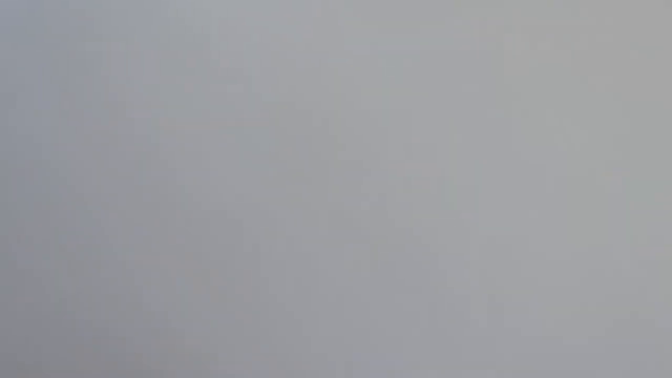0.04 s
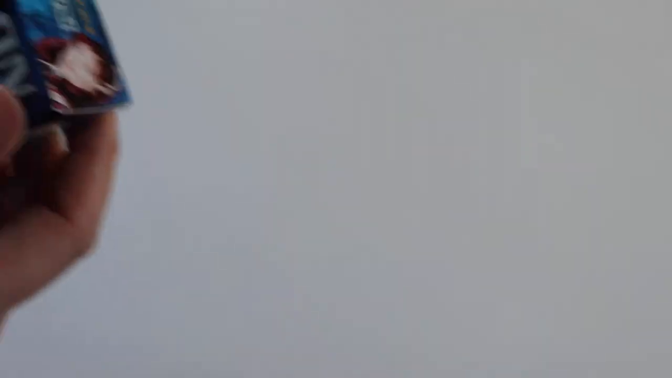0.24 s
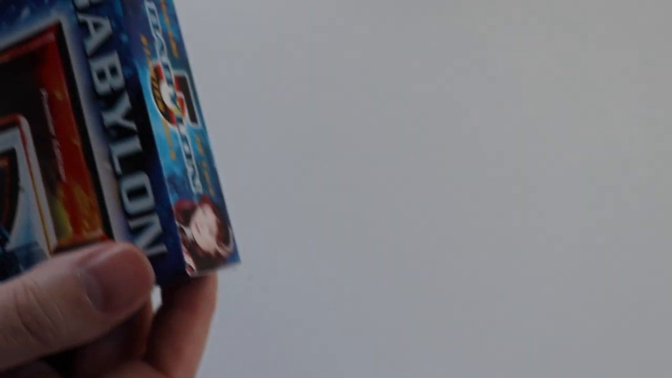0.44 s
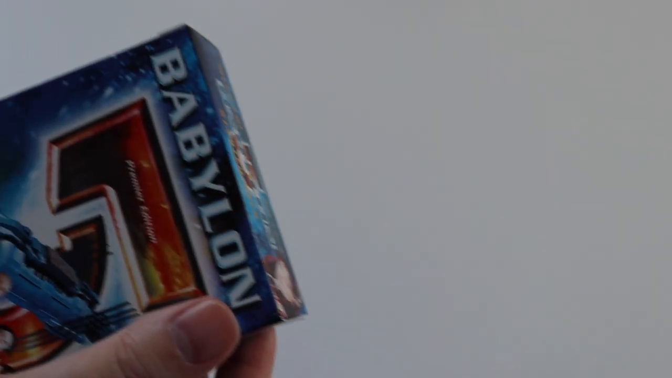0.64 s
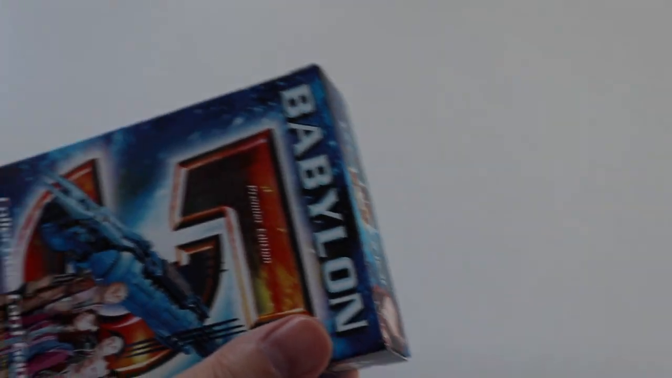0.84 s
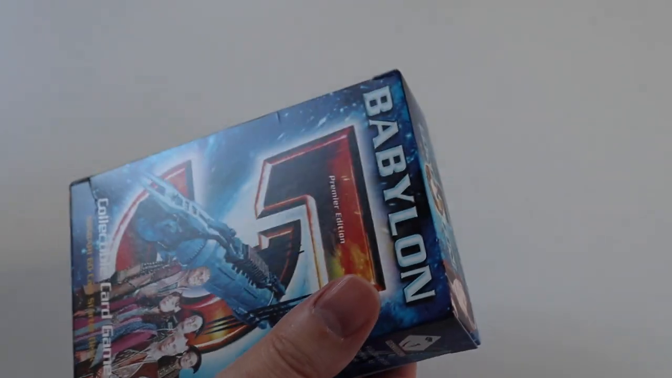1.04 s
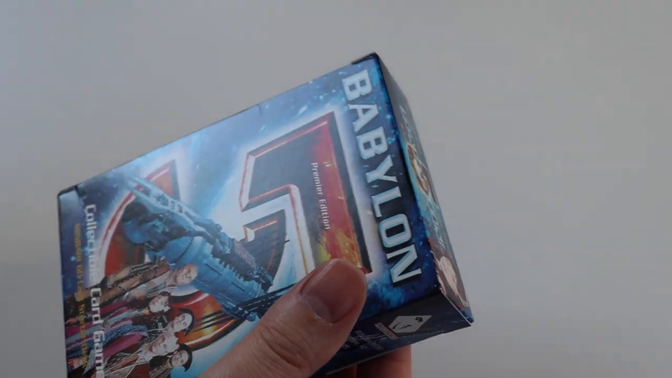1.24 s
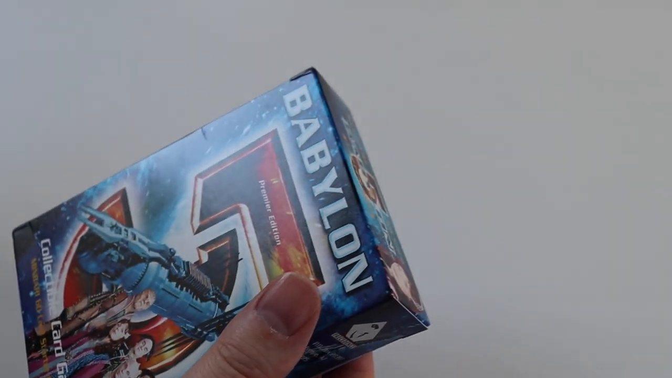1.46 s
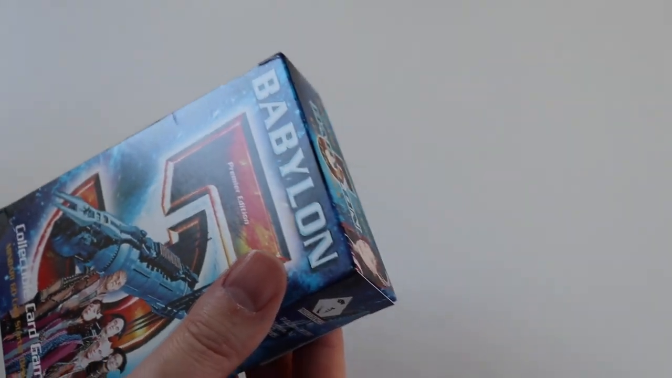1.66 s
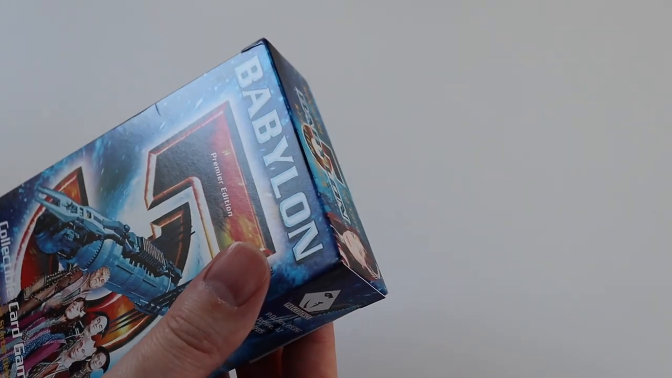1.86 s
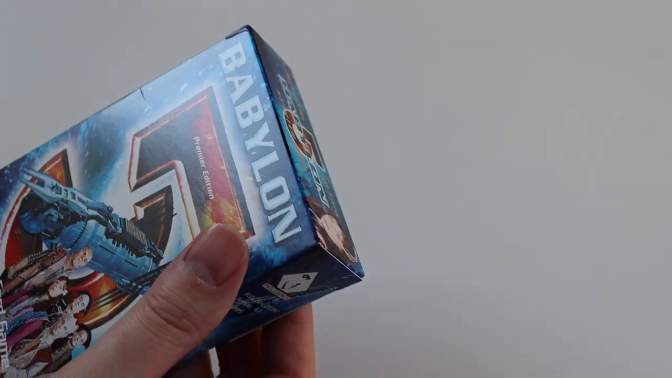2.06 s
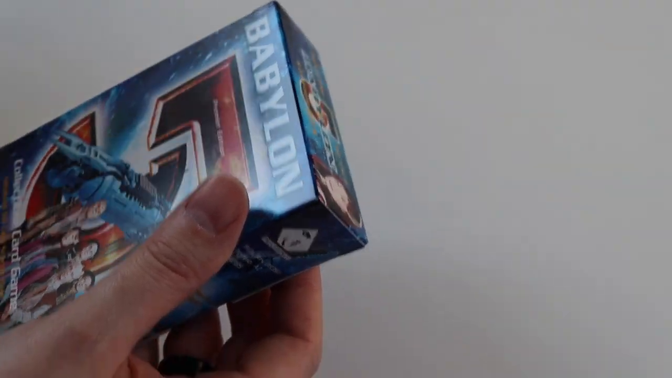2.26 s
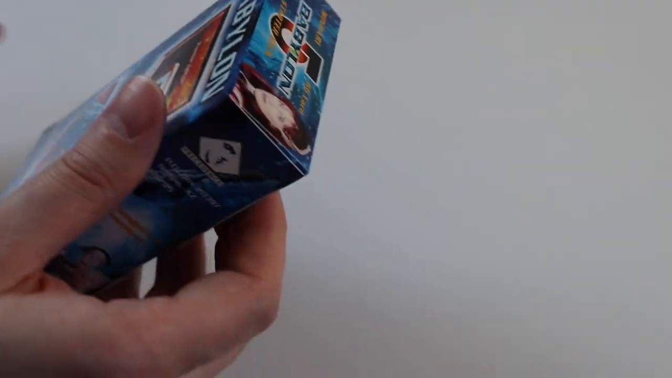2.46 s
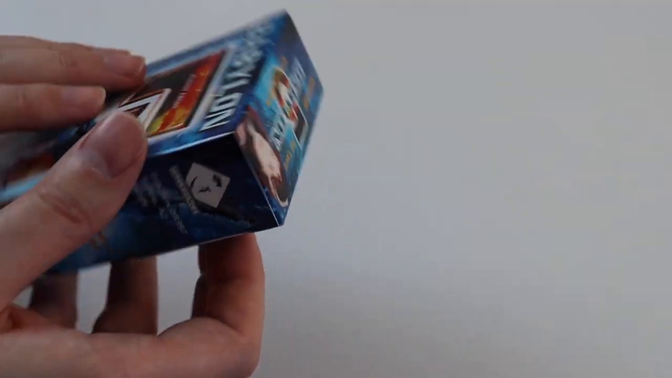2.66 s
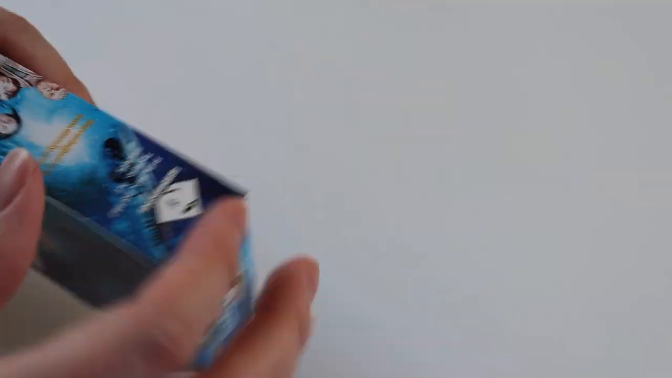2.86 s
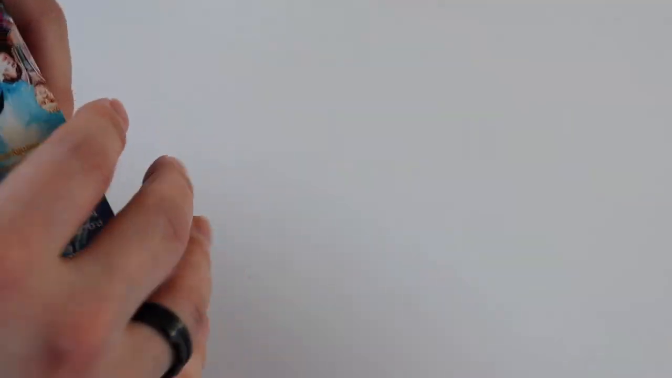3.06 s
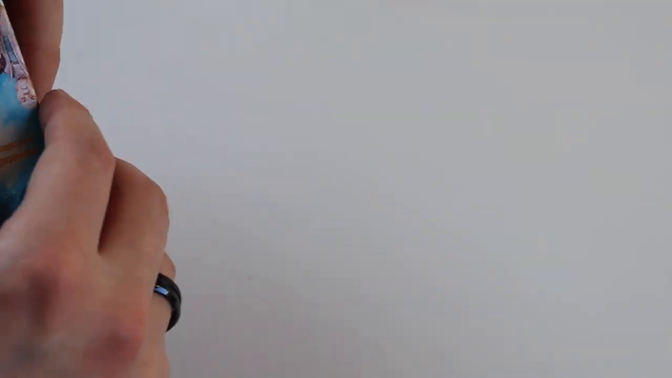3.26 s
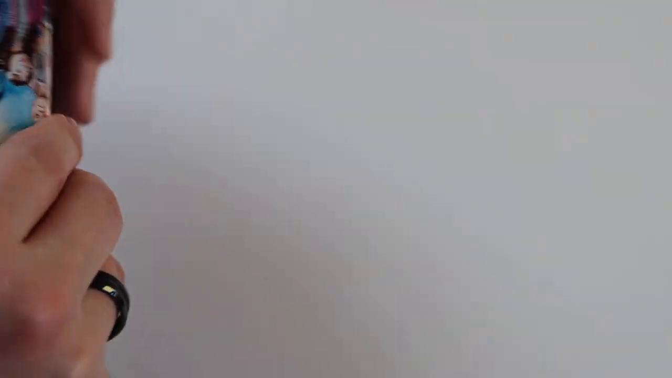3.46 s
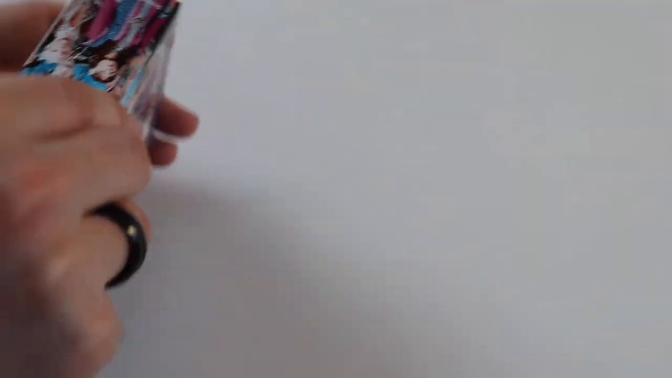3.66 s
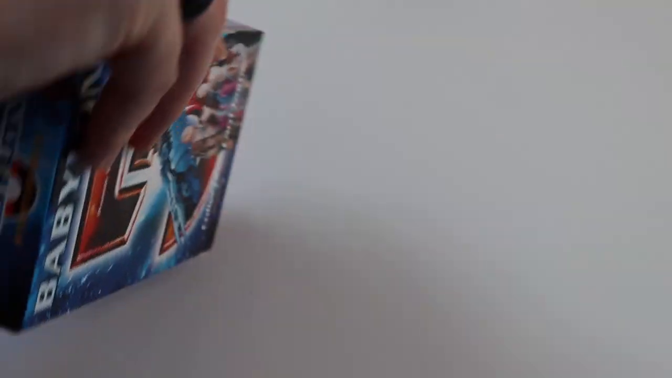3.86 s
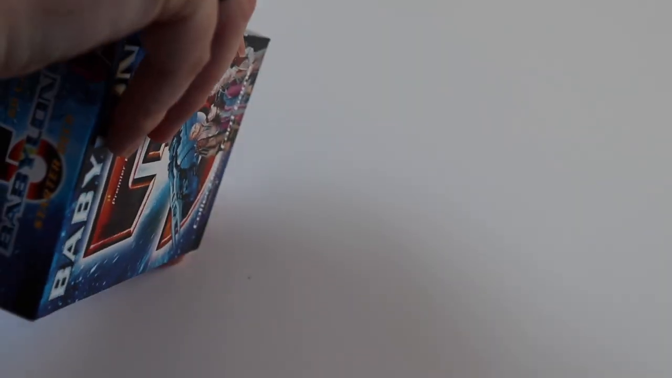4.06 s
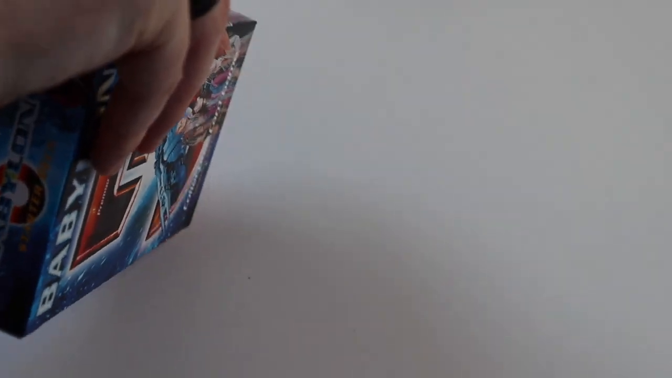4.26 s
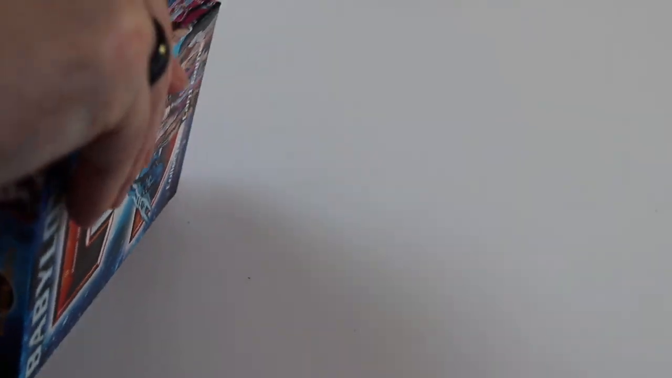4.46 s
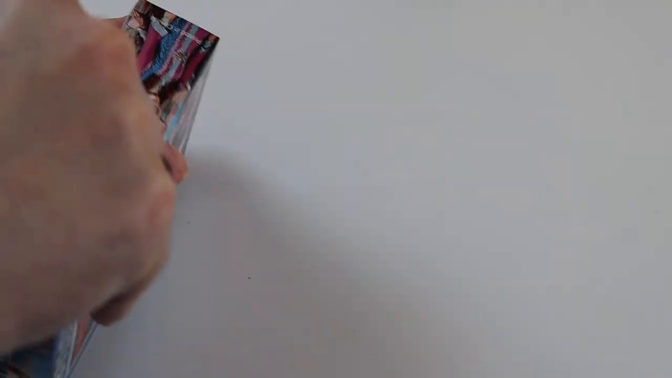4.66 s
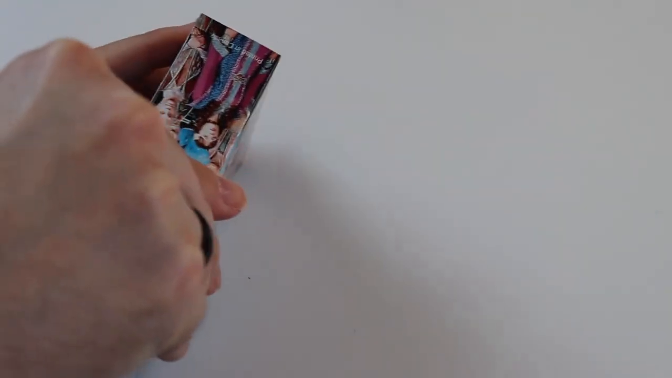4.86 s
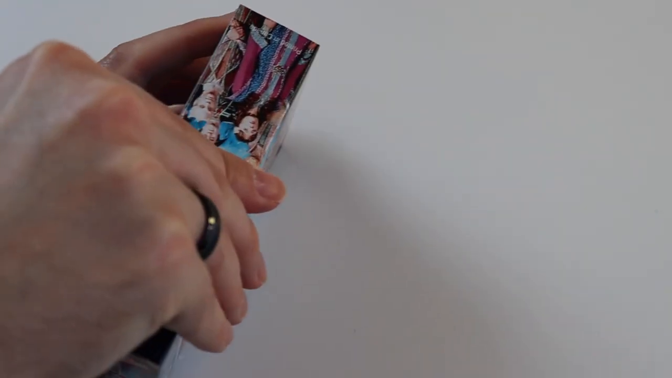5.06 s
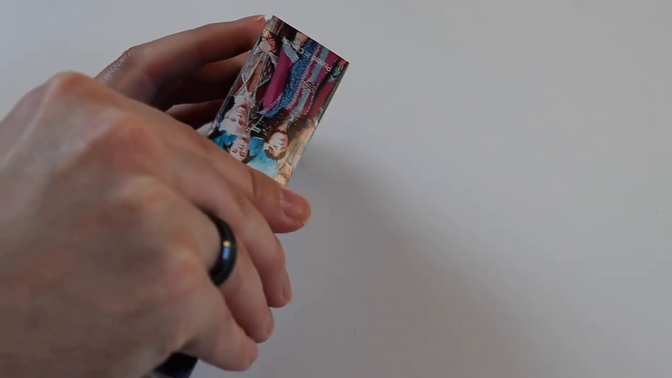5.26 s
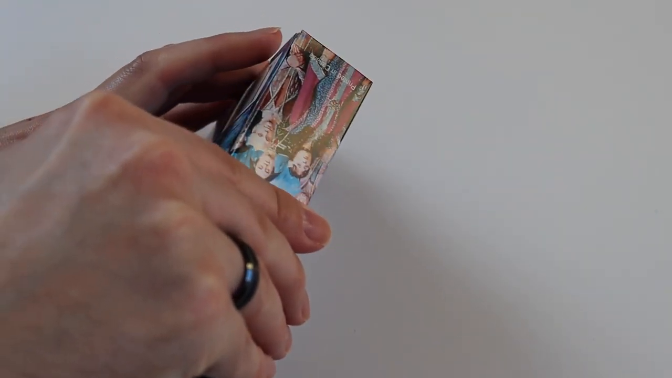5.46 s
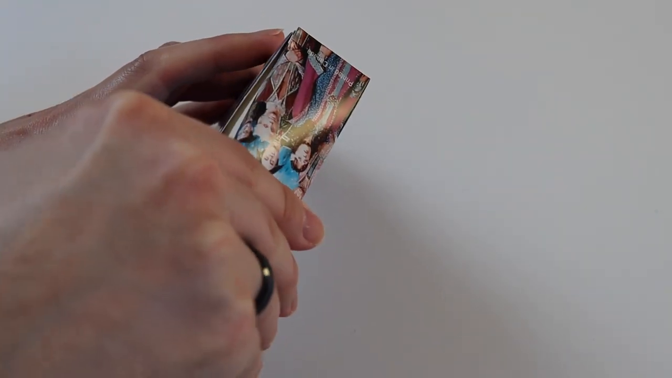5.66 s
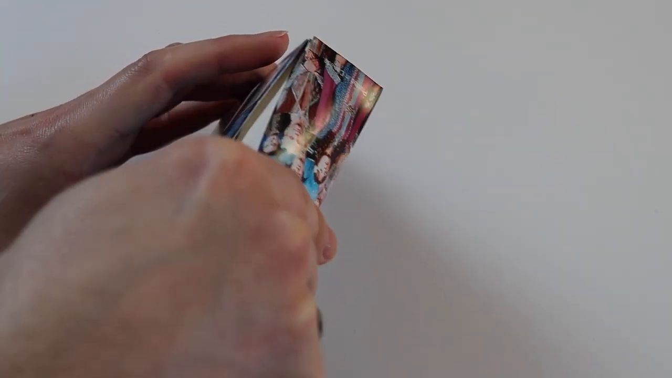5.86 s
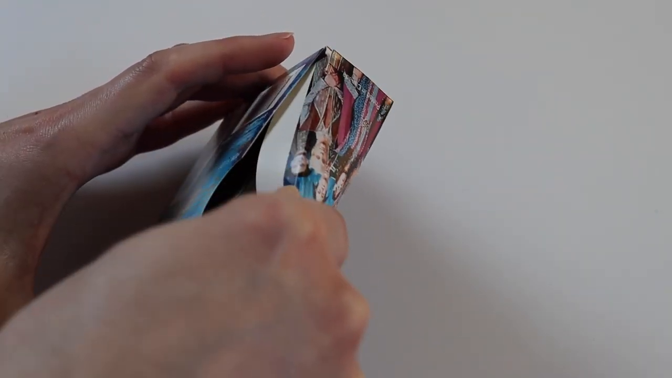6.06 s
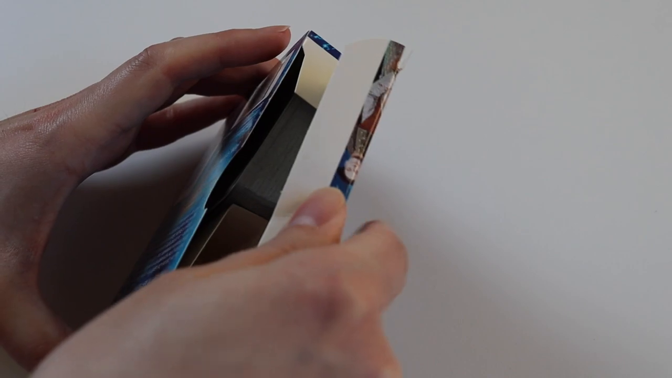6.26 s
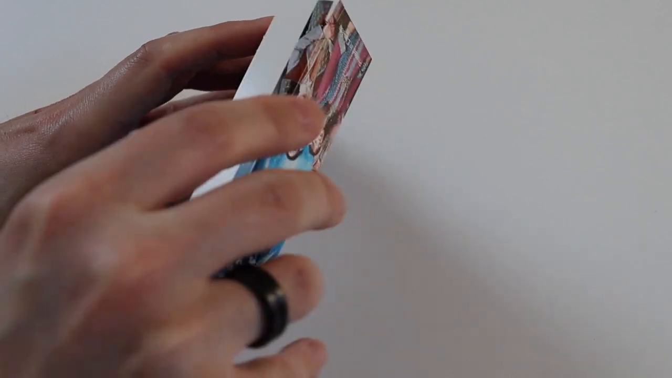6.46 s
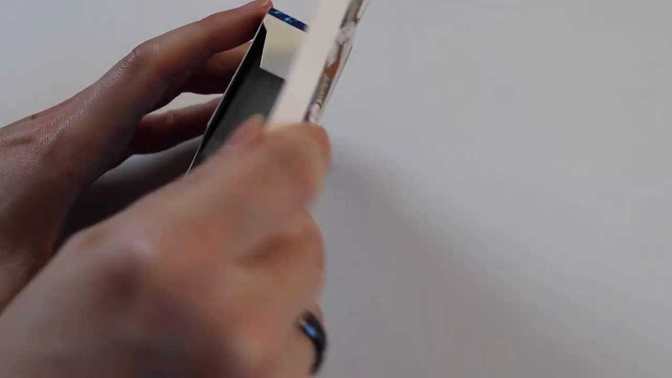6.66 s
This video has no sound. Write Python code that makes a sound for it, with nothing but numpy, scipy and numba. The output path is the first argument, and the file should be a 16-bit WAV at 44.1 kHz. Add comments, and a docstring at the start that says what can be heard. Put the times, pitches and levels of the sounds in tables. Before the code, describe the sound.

Fingers tap and slide over a small cardboard box close by, until its glued flap pops open with loud cracks.

```python
"""A small cardboard box is tapped, turned and pried open at its glued flap, close to a stereo microphone.
Taps, rattles and glue snaps are impulses that excite the damped modes of its panels. Sliding fingers
drive the same modes by stick-slip friction, and dry skin hisses on the print. Beneath the box the
tabletop rumbles and jolts under the forearms; a small quiet room adds its reverberation."""
import sys
import numpy as np
from scipy import signal
from scipy.fft import rfft, irfft, next_fast_len
from scipy.io import wavfile
from scipy.ndimage import uniform_filter1d, map_coordinates
from numba import njit

SR = 44100
rng = np.random.default_rng(int(sys.argv[2]) if len(sys.argv) > 2 else 0)


def to_wav(sig):
    """Store sig (one row per channel, or 1-D mono) as 16-bit WAV at the path in sys.argv[1].

    Samples outside -1..1 are clipped; the rate is SR.
    """
    pcm = np.clip(np.atleast_2d(sig), -1, 1) * 32767
    pcm = np.round(pcm).astype(np.int16)
    wavfile.write(sys.argv[1], SR, pcm.T)  # frames by channels


N = 296352

# Spectra, as relative level per hertz: f/Hz, level/dB
NOISE_FLOOR = [(18, -45), (30, -15), (204, -0.5), (364, -4), (554, -11), (632, -10), (1010, -6),
               (3670, -9.5), (9970, -18.5), (14800, -18.5), (16000, -21)]  # room tone and microphone hiss
SKIN_HISS = [(3500, 10.5), (5000, 7.5), (7000, 7), (10000, 1), (13000, -7), (16500, -26.5)]  # dry skin on print
CRACK = [(3000, 4), (5000, 8), (7000, 5), (10000, -0.5), (13000, -1), (16500, -3.5)]  # a hard contact
# Filter responses: f/Hz, gain/dB
RADIATION = [(60, -68), (200, -10.5), (300, -3), (20000, -1.5)]  # a small box moves little air in the bass
SHARED_TONE = [(20, -22), (500, 10.5), (1400, -23), (16000, -44)]
TABLE_RING = [(40, -49), (110, -15), (150, -2), (900, 8), (3000, -20)]
TABLE_SHAKE = [(25, -2), (60, -2), (90, 4.5), (130, 9), (170, -26), (400, -62)]
SKIN_AIR = [(9000, -31), (12500, -8), (15500, 6.5), (20000, 6)]
# Reverberation bands: f/Hz, t60/s, level/dB
ROOM_BANDS = [(262, 0.23, -21), (1094, 0.36, -6.5), (3330, 0.48, -11), (10500, 0.53, -15)]
# Normal modes: f/Hz, level/dB, t60/s
TABLE_MODES = [(148, 6.5, 0.2), (173, -30, 0.27), (186.5, 15, 0.21), (249.7, 3.5, 0.72), (350, 1, 0.3),
               (526, -6, 0.31)]
BOX_MODES = [(257.5, -21, 0.083), (359.6, -7.5, 0.082), (457, -1.5, 0.041), (491.6, -5.5, 0.061),
             (581, 1.5, 0.039), (648, -2.5, 0.081), (771, 2, 0.036), (890, -1, 0.012), (962, 4.5, 0.024),
             (1164, 5.5, 0.014), (1309, -2, 0.032), (1440, -1, 0.048), (1716, 8, 0.011), (2038, 2, 0.016),
             (2165, -1.5, 0.032), (2420, 5, 0.012), (2840, 6, 0.014), (3205, -1.5, 0.036),
             (3880, -2.5, 0.029), (4145, -1, 0.03), (4320, 6, 0.0037)]
# Arms and box pushing the tabletop: peak t/s, 20 dB rise/s, 20 dB fall/s, ring/dB, shake/dB
PUSHES = [(0, .1, 0.09, -57, -70), (.19, 0.028, 0.11, -47, -59), (.35, 0.036, .1, -49, -77),
          (.43, 0.17, 0.23, -38.5, -67), (.515, 0.14, 0.054, -51, -42.5), (.82, .2, 0.19, -52.5, -65),
          (1.16, 0.11, .1, -52.5, -62), (1.2, .06, 0.1, -52, -49.5), (1.78, .06, 0.36, -56.5, -87),
          (2.21, .07, .08, -61, -72), (2.75, .17, 0.26, -53, -70), (3.07, 0.28, 0.072, -53, -68),
          (3.22, .2, .1, -62.5, -68), (3.46, 0.064, 0.1, -50.5, -74), (3.78, 0.044, 0.081, -47, -82),
          (4.02, 0.33, .1, -57, -67), (4.7, 0.058, 0.21, -54.5, -68), (5.02, 0.17, .1, -64, -72),
          (5.39, 0.18, 0.16, -55.5, -61.5), (5.64, .04, 0.22, -56, -58), (5.78, 0.22, 0.2, -61, -51.5),
          (5.99, 0.035, 0.22, -41.5, -62), (6.12, 0.046, .2, -42, -54), (6.25, 0.12, 0.033, -44, -68),
          (6.38, 0.055, 0.051, -71, -76), (6.46, 0.084, 0.053, -57, -62), (6.72, 0.37, .1, -61, -64.5)]
# A glue spot lets go or a hand lands: t/s, f/Hz, level/dB, t60/s
JOLTS = [(.395, 186.4, -29.5, 0.47), (1.558, 298, -39, .025), (1.785, 300, -37, .03),
         (2.195, 297, -37, 0.034), (3.887, 340, -30.5, 0.034), (4.005, 60, -50, .05),
         (4.217, 300, -39.5, 0.035), (4.856, 380, -31, 0.021), (5.642, 150, -38, 0.047),
         (5.988, 252, -18, 0.086), (6.123, 70, -28, .03), (6.126, 232, -21, 0.045)]
# Finger slides: peak t/s, 20 dB rise/s, nominal fall/s, dull scrape/dB, bright scrape/dB, skin hiss/dB
SLIDES = [(0, .1, 0.25, -50.5, -41, -39.5), (.08, 0.15, 0.11, -50, -60, -50.5),
          (.182, 0.045, 0.24, -50, -49, -52), (.322, 0.23, 0.13, -51, -47, -44),
          (.432, 0.17, 0.13, -45, -45.5, -47.5), (.6, 0.41, 0.44, -52, -52, -47.5),
          (.72, 0.3, 0.38, -53, -49, -44.5), (.9, 0.33, 0.45, -68, -55, -54.5),
          (1.005, 0.046, 0.21, -59.5, -48, -42.5), (1.277, 0.4, 0.16, -56, -56.5, -63),
          (1.457, 0.24, 0.045, -63.5, -75, -55), (1.569, 0.029, 0.38, -62.5, -53, -53),
          (1.689, 0.35, .17, -69, -65, -53), (1.798, 0.061, 0.26, -55.5, -51.5, -46),
          (2.08, 0.028, 0.46, -73, -61, -55.5), (2.275, 0.044, 0.047, -51, -53, -47),
          (2.504, 0.031, 0.041, -30, -34, -50), (2.684, 0.027, 0.23, -47, -52, -56),
          (2.735, 0.091, 0.13, -56, -45, -41), (2.785, 0.095, 0.076, -39.5, -37.5, -55),
          (2.901, 0.36, 0.25, -45, -78, -76), (3.113, 0.021, 0.28, -56, -46.5, -48),
          (3.153, 0.035, 0.046, -24, -54, -49), (3.27, 0.08, 0.28, -48, -55, -47),
          (3.335, 0.062, 0.12, -41.5, -46, -41), (3.539, 0.13, 0.085, -45, -48, -49),
          (3.754, 0.018, 0.16, -42, -38.5, -42.5), (3.779, 0.025, 0.13, -29.5, -36.5, -43),
          (3.9, 0.027, .2, -35, -45, -46), (3.943, 0.043, 0.089, -26, -30.5, -35),
          (4.018, 0.063, 0.074, -25, -28.5, -36.5), (4.21, .1, .06, -54.5, -58, -56),
          (4.365, 0.2, 0.044, -54.5, -56.5, -60), (4.622, 0.27, 0.067, -52.5, -67, -75),
          (4.679, .03, .2, -52, -53.5, -59), (4.88, 0.038, 0.16, -43, -46, -50.5),
          (4.925, 0.15, 0.035, -42.5, -51, -49.5), (5.116, 0.36, 0.067, -54, -54, -58),
          (5.173, .1, 0.33, -69, -61, -56), (5.34, 0.37, 0.36, -45.5, -59, -80),
          (5.51, 0.27, 0.25, -55, -63, -64), (5.587, 0.035, 0.11, -30.5, -36.5, -50),
          (5.655, 0.011, 0.14, -25.5, -28.5, -24), (5.707, 0.05, 0.03, -37, -34, -26),
          (5.782, 0.044, 0.087, -42, -34, -33.5), (5.874, .04, 0.074, -30.5, -33, -33),
          (5.999, 0.015, .1, -25.5, -27.5, -30.5), (6.136, 0.076, 0.16, -28.5, -27.5, -29.5),
          (6.22, 0.23, 0.19, -38.5, -32, -57), (6.453, 0.053, 0.11, -39.5, -44.5, -48.5),
          (6.657, 0.14, 0.074, -46.5, -51.5, -48.5)]
# Grip while rubbing: t/s, free low panel f/Hz, free high panel f/Hz, low panel/dB, top of skin hiss/dB
GRIP = [(0, 710, 2950, 2, -10), (.08, 696, 2950, -8, 8.5), (.19, 460, 2400, -13, -2),
        (.69, 770, 2290, -23, -10), (1.05, 710, 3050, -4, -6), (1.3, 580, 2630, -5, -6),
        (1.76, 600, 2310, 0, -6), (2.04, 560, 3020, -13, -3), (2.5, 560, 1710, -11, -8),
        (2.86, 980, 1730, -27, -7), (3.2, 830, 1660, -2, -7), (3.33, 1100, 2050, 1.5, -15),
        (3.55, 417, 2050, 2.5, -5), (3.72, 810, 2220, -1.5, -17), (4.25, 700, 1990, -10.5, -5),
        (4.71, 443, 1950, 3, -12), (5.11, 820, 2060, -34, -13), (5.54, 643, 1920, -9, -34),
        (5.87, 660, 2430, 7, -8), (5.99, 880, 2570, -4, -17), (6.31, 636, 2300, 0.5, -25),
        (6.72, 836, 2400, -8, -10)]
# Taps, rattles and snaps: t/s, level/dB, struck panel f/Hz, hollow/dB, panel/dB, crack/dB,
# chatter decay/ms, struck panel/dB, left minus right/dB; hollow, panel and crack are relative to level
KNOCKS = [(.022, -26.5, 833, -16, -33, -9, 7, 13, 5), (0.155, -36.5, 372, -6, -7, -39, 5, 10, -7),
          (.169, -28.5, 330, -17.5, -31, -13, 30, 23, 0), (0.266, -23, 315, -26, -23, -14.5, 2.5, 7, 0),
          (.28, -33, 390, -8, -14, -27, 6.4, 3, -3), (.303, -29, 7460, -33, -29, -3.5, 4.1, 5, -1),
          (.329, -37, 790, -24, -18, -5.5, 6, 16, -7), (.394, -35, 365, -7, -24, -4.5, 7, 9, -1),
          (.425, -27.5, 825, -13, -7.5, -36, 8.6, 11, 0), (.494, -40, 550, -13, -23, -5, 4.7, 18, -8),
          (.589, -43, 1040, -24, -18, -15, 7.6, 13, 2.5), (.651, -28, 5360, -31, -22, -9, 10, 5, -1),
          (.696, -32, 1840, -16.5, -9, -9.5, 9.2, 6, -5), (.719, -35.5, 2730, -31, -12, -3.5, 5.4, 17, -3),
          (0.818, -35, 2490, -36, -10.5, -5.5, 16, 20, -3), (0.979, -41, 4070, -30, -12, -5, 4.1, 17, 1),
          (1.006, -31.5, 6870, -34, -18, -1.5, 4.4, 14, 0), (1.274, -39, 2460, -22, -14, -7, 6.9, 21, -1.5),
          (1.556, -33.5, 820, -14, -11, -12, 7, 3, -2), (1.605, -29, 1570, -27, -15.5, -9.5, 12, 2, -2.5),
          (1.709, -42, 355, -11, -9, -33, 5.7, -1, -10),
          (1.787, -27.5, 495, -15.5, -11.5, -9, 5.2, -1, -2.5), (1.913, -39, 301, -22, -15, -8, 9.7, 9, -3),
          (2.07, -37, 3950, -36, -20, -5.5, 6, 3, -2.5), (2.134, -39, 380, -14, -11, -16, 11, 6, -2),
          (2.195, -30.5, 396, -13, -19, -14.5, 5.7, -13, -1), (2.47, -39, 483, -16, -7, -14, 20, 6, -1),
          (2.489, -33, 490, -18, -12, -22, 7.5, 5, -3), (2.505, -24, 449, -13.5, -14.5, -32, 8, 2, -3),
          (2.673, -31, 860, -12, -8.5, -37, 4.3, 5, 1), (2.747, -35, 350, -21, -17, -14, 11, 22, -2.5),
          (2.768, -24, 736, -6.5, -12.5, -40, 8.9, 5.5, 3.5),
          (2.788, -20.5, 1785, -8.5, -9.5, -37, 6, 17, -.5), (2.83, -21.5, 986, -11, -2, -29, 11.3, 25, -2),
          (2.922, -28.5, 985, -8, -15, -51, 6, 29, -.5), (3.029, -37.5, 450, -8.5, -18.5, -42, 3.4, 11, -2),
          (3.127, -34, 1800, -25, -9, -15, 8, 19, -4), (3.135, -27, 880, -11, -15, -20, 8.7, 6, 9),
          (3.15, -32, 940, -15, -10, -33, 10, 7, -7), (3.313, -27, 1980, -15, -10, -26, 6.8, 22, 1),
          (3.333, -38, 760, -20, -15, -25, 8.4, 12, 0), (3.366, -17, 1190, -16.5, -11.5, -25.5, 5.8, 14, 0),
          (3.748, -21.5, 1200, -13, -11.5, -26, 5.3, 26, 2), (3.768, -24, 503, -13, -13, -28, 5.1, 21, -2),
          (3.787, -18, 813, -14, -9.5, -23.5, 9, 20, -6), (3.888, -26.5, 362, -2.5, -31, -24, 6.2, 4, 0),
          (3.904, -24.5, 680, -13, -14, -25, 7.9, 19, -8),
          (3.917, -22.5, 700, -12, -13.5, -21, 4.4, 18, -11),
          (3.924, -19.5, 996, -14, -12, -24, 5.2, 13, 10),
          (3.932, -16, 2200, -19, -11, -22, 3.7, 15, -12.5),
          (3.941, -11, 693, -11, -11, -16.5, 6.2, 4, -1.5), (4.003, -21.5, 693, -1, -28, -26, 8.8, 8, 0),
          (4.007, -15.5, 633, -18, -14.5, -25, 12, 3, -17), (4.02, -14, 2290, -26, -8, -27, 5.8, 5, -6),
          (4.027, -14.5, 672, -8.5, -20, -41, 6, 5, -2), (4.154, -35, 720, -9, -29, -14, 2.9, 2, 2),
          (4.212, -31, 361, -21, -20.5, -18, 2.5, 15, 1), (4.535, -45, 395, -8.5, -11, -28, 7.4, 15, 0),
          (4.613, -44.5, 450, 0, -29, -30, 8.9, 10, 0), (4.689, -36.5, 424, -3, -20, -26, 6.4, 5, -2),
          (4.705, -29, 426, -4.5, -24, -28, 10, 10, -1), (4.855, -28.5, 492, -9, -16.5, -24, 5.3, 1.5, -2),
          (5.04, -38.5, 3650, -21, -9.5, -25, 4.1, 20, 12),
          (5.109, -31.5, 986, -16, -10, -16.5, 9.4, 7, 1.5), (5.162, -25, 2040, -23, -12, -13, 4.5, 10, -2),
          (5.304, -37.5, 486, -8, -16, -12, 5.9, 0, 1), (5.32, -33, 784, -17, -18, -33, 4.6, 6, -1),
          (5.359, -31, 656, -8.5, -17, -23, 4.5, 6.5, -4), (5.384, -37, 953, -12, -12, -19, 3.6, 10, -2),
          (5.444, -41, 436, -7, -12, -10, 7, 9, -2), (5.47, -39, 1960, -15, -7, -24, 6.5, 4, -3),
          (5.566, -27.5, 457, -9.5, -15, -34, 8.2, 13, 1), (5.611, -34, 1430, -9, -0.5, -7.5, 4.1, 18, -2),
          (5.642, -.5, 681, -8.5, -16.5, -25, 3.4, 14.5, -2.5),
          (5.694, -13, 1150, -40, -6.5, -15, 12, 9, -1), (5.713, -6.5, 1480, -36, -10, -20, 5.8, 12, -3),
          (5.766, -3, 1113, -19.5, -12, -16, 5.5, 6, -5.5),
          (5.86, -2, 666, -15.5, -18.5, -17, 2.4, 26, -3.5), (5.968, -25, 806, -6.5, -11, -34, 7.1, 9, -2),
          (5.989, -7, 919, -19, -9, -8.5, 6, 6, 0.5), (5.995, -12, 970, -14, -9, -12.5, 3.7, 8, 12),
          (6.125, 0.5, 2560, -29.5, -12.5, -14, 3.3, 11, -3.5),
          (6.132, -8.5, 1486, -15, -13, -21, 1.8, 19, -6),
          (6.443, -13.5, 1164, -16.5, -12, -19.5, 3.7, 3, -4.5),
          (6.574, -32.5, 1360, -18, -8.5, -25, 3.8, 9, 0), (6.605, -31.5, 617, -17, -23, -19.5, 6, 0, -2),
          (6.653, -24, 1380, -21, -4.5, -20, 6.5, 8.5, 3)]
# The first contact stands out more in a tap than in a loud snap: knock level/dB, contact size
FIRST_CONTACT = [(-21, 2.44), (1, 2.2)]
# Tabletop reflection at the left and right capsule: delay/s, level/dB
TABLE_ECHO = [(.00042, -14), (.00061, -14)]
# The hands move from the left towards the microphone axis: t/s, right capsule lag/samples
RIGHT_LAG = [(0, 5.6), (2.5, 3.42), (4, 2.65), (6.72, 2.73)]

HOLLOW_TOP_HZ, STRUCK_RING_CYCLES = 900, 49
NOISE_FLOOR_DB, HIGH_PANEL_DB = -57, -3
CUTOFF_HZ = 16150


def undb(db):
    """Amplitude ratio of a level in decibels."""
    return 10 ** (np.asarray(db) / 20)


def unit(x, size=None):
    """Normalisation to rms 1, taken over the first size samples or all."""
    return x / np.sqrt(np.mean(x[:size] ** 2) + 1e-18)


def colour(x, points):
    """Filtering as multiplication of the spectrum by a curve of (f/Hz, gain/dB) points."""
    hz, db = np.transpose(points)
    size = next_fast_len(len(x))
    f = np.arange(size // 2 + 1) * SR / size + 1
    gain = undb(np.interp(np.log(f), np.log(hz), db, left=-90))
    return irfft(rfft(x, size) * gain, size)[:len(x)]


def rings(modes, size=8192):
    """Free vibration: one exponentially damped sine for each mode."""
    hz, db, t60 = np.array(modes).T[:, :, None]
    t = np.arange(size) / SR
    return undb(db) * np.sin(2 * np.pi * hz * t) * np.exp(-np.log(1000) * t / np.maximum(t60, .005))


@njit
def resonate(x, hz, q):
    """Forced resonance: a state-variable band-pass with gain 1 at its moving centre."""
    y, band_state, low_state = np.empty(len(x)), 0., 0.
    for i in range(len(x)):
        g = np.tan(np.pi * hz[i] / SR)
        band = (band_state + g * (x[i] - low_state)) / (1 + g * (g + 1 / q))
        band_state, low_state = 2 * band - band_state, low_state + 2 * g * band
        y[i] = band / q
    return y


def wander(rate):
    """Random modulation: Gaussian values joined by ramps of 1 / rate seconds."""
    hold = int(SR / rate)
    return uniform_filter1d(np.repeat(rng.standard_normal(N // hold + 1), hold), hold)[:N]


def grit(size, rate, spread_db):
    """Poisson process: clicks of uneven size, on average rate per second."""
    hit = rng.random(size) < rate / SR
    return hit * rng.standard_normal(size) * undb(spread_db * np.minimum(rng.exponential(size=size), 3))


def curves(table):
    """Linear interpolation of each column against the first, time."""
    times, *columns = np.transpose(table)
    return [np.interp(np.arange(N) / SR, times, column) for column in columns]


def swells(rows, fall_scales, rest_dbs):
    """Incoherent addition: exponential rises and falls sum in power, one gain curve per level column."""
    peak, rise, fall, *levels = np.array(rows, float).T[:, :, None]
    t = np.arange(0, N + 64, 64) / SR
    gains = []
    for db, scale, rest_db in zip(levels, fall_scales, rest_dbs):
        away = np.maximum((peak - t) / rise, (t - peak) / (fall * scale))
        power = np.sum(undb(db - 20 * away) ** 2, 0) + undb(rest_db) ** 2
        gains.append(np.interp(np.arange(N) / SR, t, np.sqrt(power)))
    return gains


def noise_floor():
    """Partial coherence: the capsules share some low room tone, but their treble hiss is independent."""
    shared = colour(rng.standard_normal(N), SHARED_TONE)
    pair = np.array([colour(rng.standard_normal(N) + .5 * shared, NOISE_FLOOR) for _ in range(2)])
    return unit(pair) * undb(NOISE_FLOOR_DB)


def reverberation(x):
    """Diffuse field: each capsule hears its own noise tail, each band decaying at its own rate."""
    t = np.arange(16384) / SR
    out = []
    for _ in range(2):
        tail = 0
        for hz, t60, db in ROOM_BANDS:
            passband = [(hz / 4, -30), (hz / 1.99, 0), (hz * 1.57, 0), (hz * 4, -30)]
            band = unit(colour(rng.standard_normal(len(t)), passband))
            echoes = band * (1 - np.exp(-t / .001)) * 1000. ** (-t / t60)
            tail = tail + undb(db) * echoes * np.sqrt(hz / SR * 4 / np.sum(echoes ** 2))
        out.append(signal.fftconvolve(x, tail)[:N])
    return np.array(out)


def table_rumble():
    """Forced vibration: soft uneven pushes ring the tabletop and shake it on its legs."""
    ring_gain, shake_gain = swells(PUSHES, fall_scales=(1, 1), rest_dbs=(-77, -76.5))
    force = rng.standard_normal(N) * undb(2.2 * wander(25))
    ring = signal.fftconvolve(force, rings(TABLE_MODES, size=12288).sum(0))[:N]
    return ring_gain * unit(colour(ring, TABLE_RING)) + shake_gain * unit(colour(force, TABLE_SHAKE))


def jolts():
    """Damped oscillation: box or tabletop swings at one low frequency, building up over about a cycle."""
    out, t = np.zeros(N + 8192), np.arange(8192) / SR
    for onset, hz, db, t60 in JOLTS:
        start = int(onset * SR)
        out[start:start + len(t)] += rings([(hz, db, t60)])[0] * (1 - np.exp(-(t * hz) ** 2))
    return out[:N]


def gripped_modes(bend):
    """Modal perturbation: fingers bend the panels, giving each mode a random detuning and sign."""
    modes = np.array(BOX_MODES, float)
    modes[:, 0] *= 1 + bend * rng.standard_normal(len(modes))
    return rings(modes, size=2560) * rng.choice([-1, 1], (len(modes), 1))


def finger_slides():
    """Stick-slip friction: dense slips ring the box and its free panels; dry skin hisses above them."""
    dull_gain, bright_gain, hiss_gain = swells(SLIDES, fall_scales=(1.135, .85, .91), rest_dbs=[-100] * 3)
    low_hz, high_hz, low_db, air_db = curves(GRIP)
    is_dull = np.array(BOX_MODES)[:, 0] < 1400
    roughness = wander(45)
    dull = bright = 0
    for _ in range(3):  # fingers
        modes = gripped_modes(bend=.077)
        slips = grit(N, rate=1200, spread_db=1) * undb(4 * roughness)
        dull = dull + signal.oaconvolve(slips, modes[is_dull].sum(0))[:N]
        bright = bright + signal.oaconvolve(slips, modes[~is_dull].sum(0))[:N]
    # the last finger also drives the two panels that the grip leaves free
    dull = unit(dull) + undb(low_db) * unit(resonate(slips, low_hz, q=7.3))
    bright = unit(bright) + undb(HIGH_PANEL_DB) * unit(resonate(slips, high_hz, q=4.3))
    # fingertips on both sides of the box: each capsule hears one group better
    tips = [colour(grit(N, rate=4600, spread_db=-.5) * undb(3.1 * roughness), SKIN_HISS) for _ in range(2)]
    skin = unit(np.array([tips[0] + .061 * tips[1], tips[1] + .21 * tips[0]]))
    air = unit(np.array([colour(side, SKIN_AIR) for side in skin]))
    return dull_gain * dull + bright_gain * bright + hiss_gain * (skin + undb(air_db) * air)


def box_knocks():
    """Impulse response: a first contact and its chatter ring the box, favouring the struck panel."""
    mode_hz = np.array(BOX_MODES)[:, 0]
    is_hollow = mode_hz < HOLLOW_TOP_HZ
    out, t, window = np.zeros((2, N + 16384)), np.arange(1536) / SR, int(.013 * SR)
    for onset, level_db, hz, hollow_db, panel_db, crack_db, chatter_ms, struck_db, pan_db in KNOCKS:
        envelope = (1 - np.exp(-t / .0015)) * np.exp(-t / (chatter_ms / 1000))
        contacts = envelope * (grit(len(t), rate=2500, spread_db=2) + .24 * rng.standard_normal(len(t)))
        contacts[40] += np.interp(level_db, *np.transpose(FIRST_CONTACT))
        nearness = 1 / (1 + (np.log(mode_hz / hz) / .15) ** 2)
        modes = gripped_modes(bend=.023) * undb(6 * nearness)[:, None]
        hollow = signal.fftconvolve(contacts, modes[is_hollow].sum(0))
        panel = signal.fftconvolve(contacts, modes[~is_hollow].sum(0))
        # the earliest contacts are the hardest: they set the struck panel going
        hard = contacts * (.88 + 1.8 * np.exp(-t / .0019))
        t60 = min(STRUCK_RING_CYCLES / hz, .085)
        struck = signal.fftconvolve(hard, rings([(hz, struck_db, t60)], size=2560)[0])
        if hz < HOLLOW_TOP_HZ:
            hollow += struck
        else:
            panel += struck
        crack = contacts * (1 + .08 * np.exp(-t / .0024)) + .77 * envelope * rng.standard_normal(len(t))
        crack = np.pad(colour(crack, CRACK), (0, len(hollow) - len(t)))
        parts = (hollow_db, hollow), (panel_db, panel), (crack_db, crack)
        blow = sum(undb(db) * unit(part, window) for db, part in parts)
        # each spot on the box has its own path difference to the two capsules
        starts = int(onset * SR) + np.array([0, rng.integers(-2, 2)])
        for side, start in enumerate(starts):
            out[side, start:start + len(blow)] += blow * undb(level_db + pan_db * (.5 - side))
    return out[:, :N]


def scene():
    """Superposition: direct sound, reaching the left capsule first, tabletop reflection and room."""
    box = box_knocks() + finger_slides() * undb([[-.3], [.3]])
    box = [side + undb(db) * np.roll(side, int(lag * SR)) for side, (lag, db) in zip(box, TABLE_ECHO)]
    near = np.array([colour(side, RADIATION) for side in box]) + table_rumble() + jolts()
    delayed_right = map_coordinates(near[1], [np.arange(N) - curves(RIGHT_LAG)[0]], order=3)
    return np.array([near[0], delayed_right]) + reverberation(near.mean(0)) + noise_floor()


def record(dry):
    """Clipping and band limiting: peaks stop at full scale, then a steep low-pass cuts the top."""
    lowpass = signal.ellip(8, .2, 70, CUTOFF_HZ, fs=SR, output="sos")
    return signal.sosfilt(lowpass, np.clip(dry, -1, 1))


dry = scene()
out = record(dry)
to_wav(out)
```